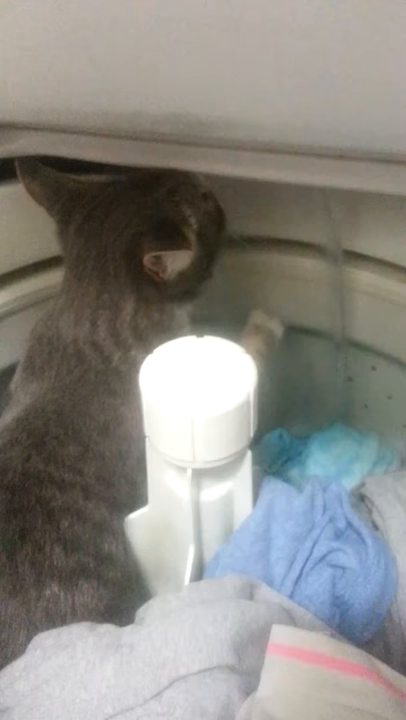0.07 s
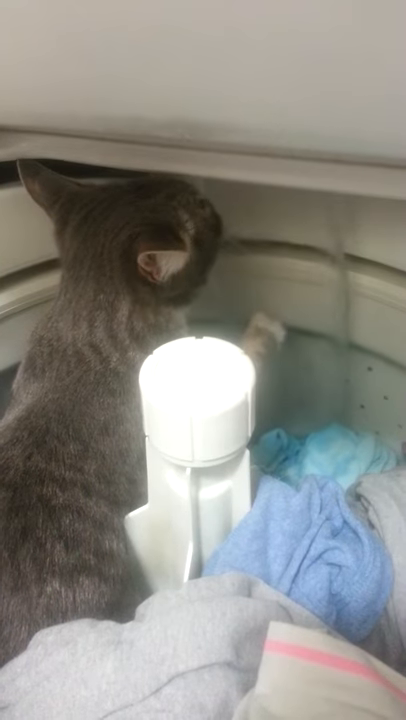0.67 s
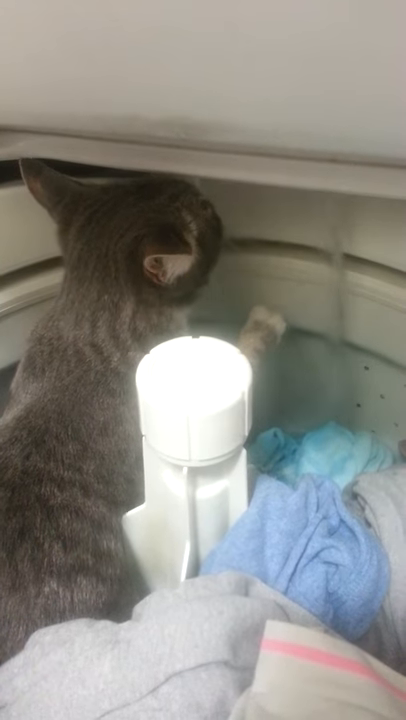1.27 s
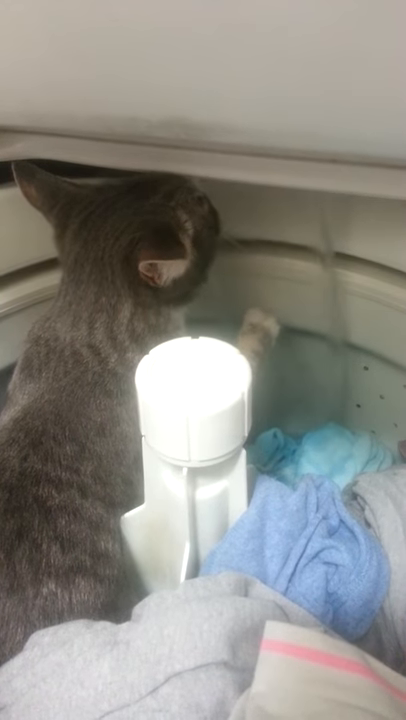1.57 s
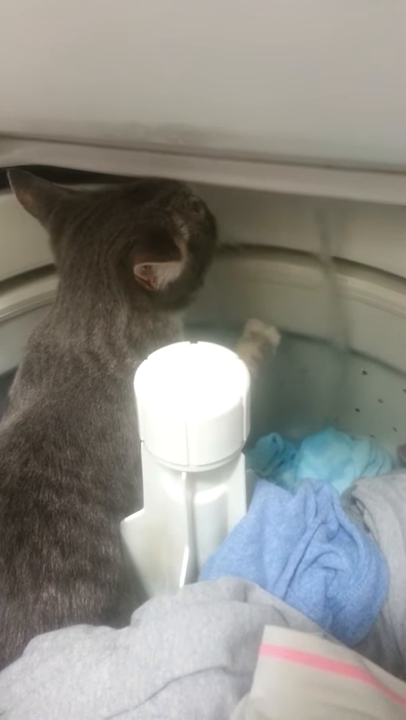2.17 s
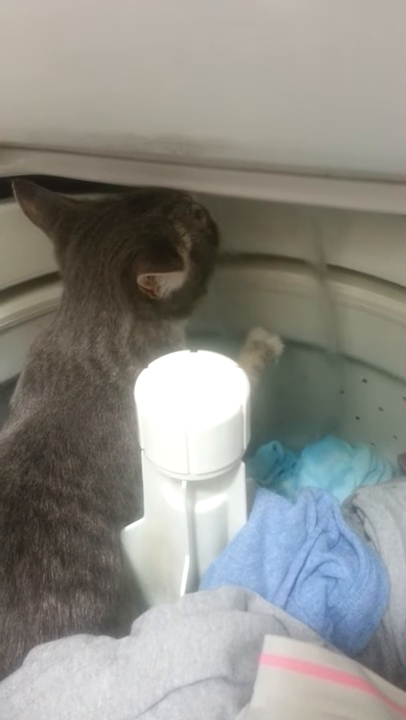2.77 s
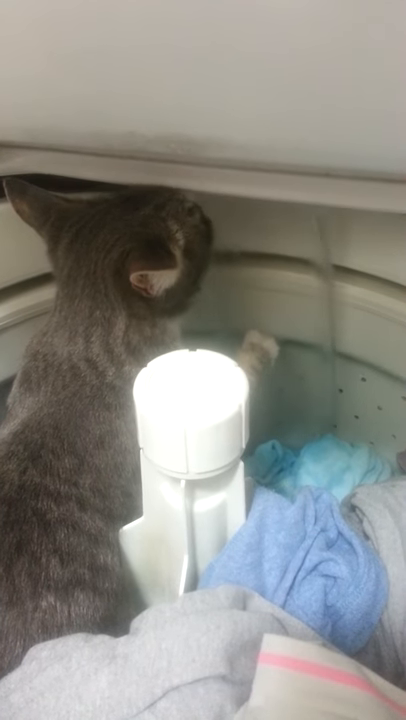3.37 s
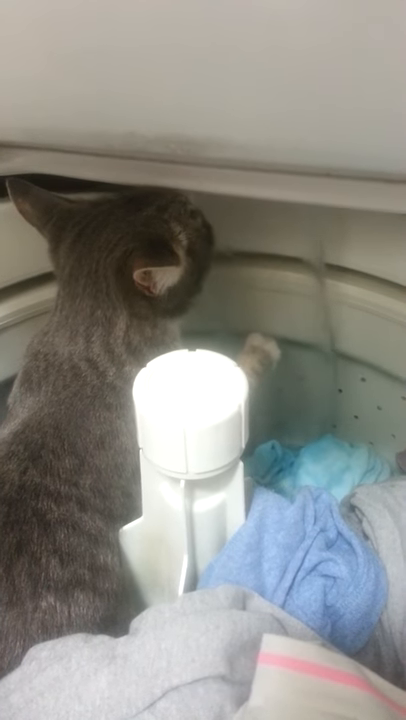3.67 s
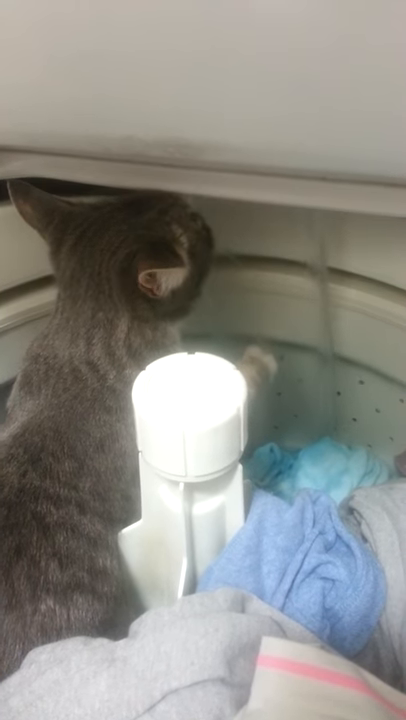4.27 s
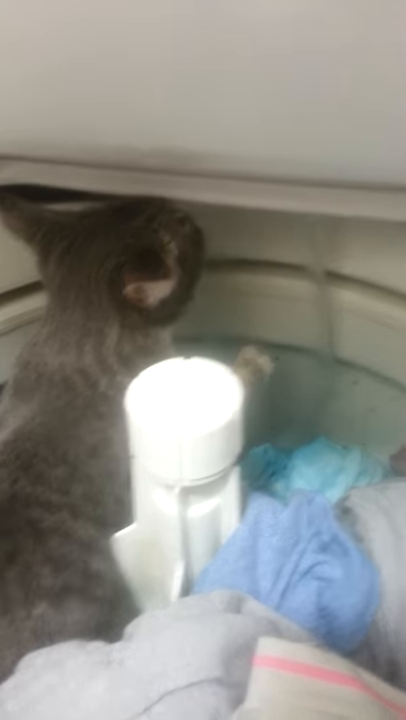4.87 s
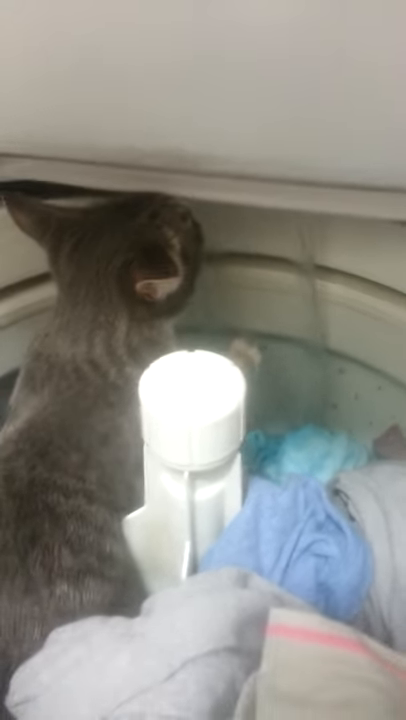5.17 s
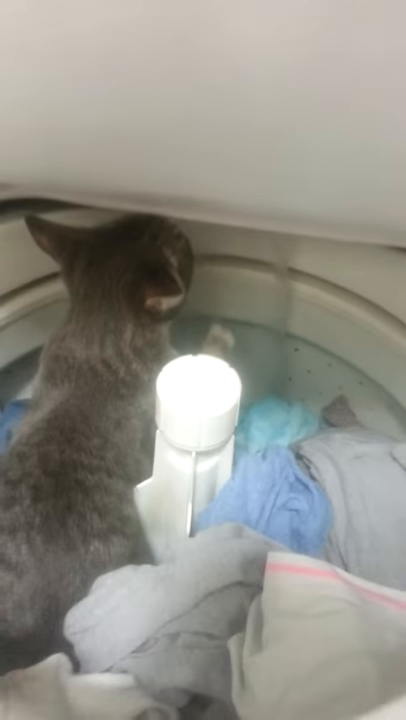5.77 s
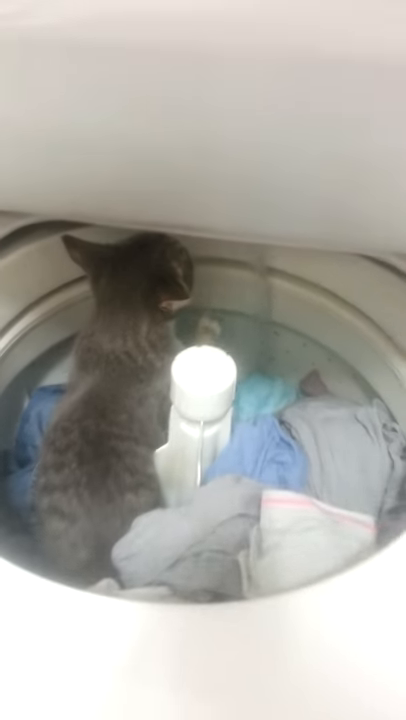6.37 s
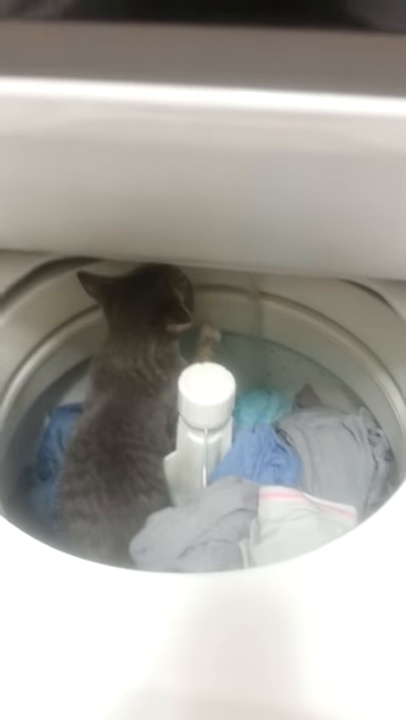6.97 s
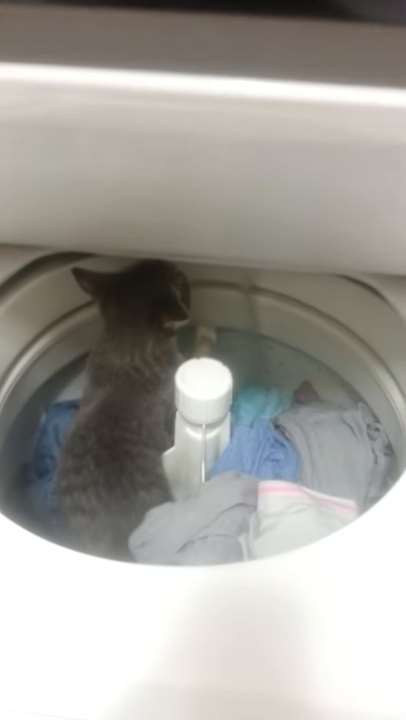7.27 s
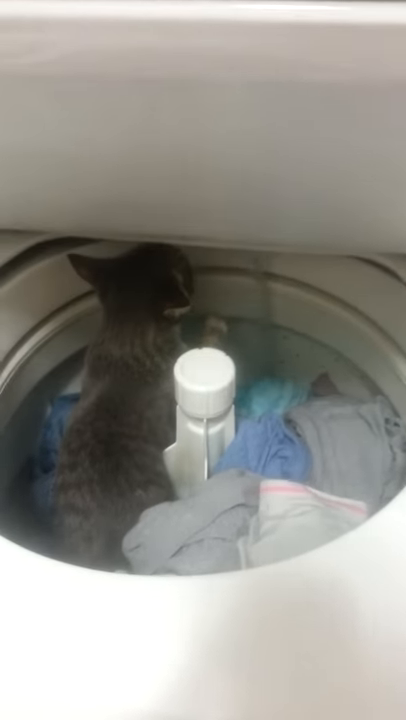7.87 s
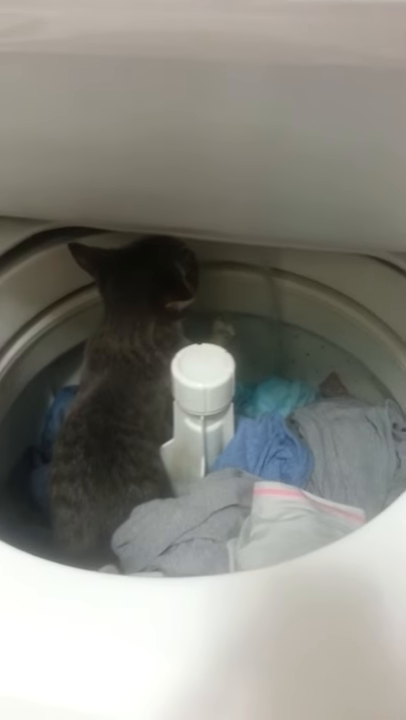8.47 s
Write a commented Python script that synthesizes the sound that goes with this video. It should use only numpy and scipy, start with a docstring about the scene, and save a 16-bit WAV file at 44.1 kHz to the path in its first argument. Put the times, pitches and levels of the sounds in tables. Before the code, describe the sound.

After silence, a splashing rush of water starts abruptly at about 0.8 seconds: a top-loading washing machine is filling, heard close at the mouth of its steel tub. The stream falls steadily into pooled water, spattering and gurgling with a hollow, slightly metallic ring, while the inlet valve hums faintly underneath. Big drops plop irregularly throughout, and droplets occasionally tick on the wall. At about 2.1 seconds a heavier slap makes the tub boom briefly, followed by two tiny, thin squeaks around 2.3 seconds. Two more dull slaps land near 5 and 5.6 seconds. From about 5.2 to 6.4 seconds, small drops come in quick flurries as the microphone draws back above the rim, and the water becomes slightly softer and less bright. The pouring and plopping continue until the end, at around 8.6 seconds.

```python
"""A splashing rush of water starts abruptly: a top-loading washing machine is filling, its valve humming.
A sheet of water falls into the pool in the steel tub, spattering and trapping bubbles that ring.
Big drops plop, droplets tick on the wall, heavy slaps make the tub boom, and two thin squeaks slip in.
From about five seconds, small drops come in flurries as the microphone draws back from the mouth of
the tub, where its resonances are strong, to above the rim."""
import sys
import numpy as np
from scipy import signal
from scipy.fft import rfft, irfft, next_fast_len
from scipy.io import wavfile
from scipy.ndimage import uniform_filter1d

SR = 44100
rng = np.random.default_rng(int(sys.argv[2]) if len(sys.argv) > 2 else 0)


def transcribe(signal):
    """Save signal, clipped to [-1, 1], as a 16-bit WAV file at the path in sys.argv[1]."""
    frames = np.atleast_2d(signal).T
    limited = np.clip(frames, -1, 1)
    pcm = np.round(limited * 32767).astype(np.int16)
    wavfile.write(sys.argv[1], SR, pcm)


N = 380583
TIME = np.arange(N) / SR
TAPS = 16384   # length of the tone-shaping filters, in samples
FREQ = np.maximum(np.arange(TAPS // 2 + 1) * SR / TAPS, 1)

# Table levels are relative: the functions add their own gains.
# low churning where the stream plunges in: (time [s], level [dB])
CHURN_LEVELS = [(0.85, -40), (2.0, -39.5), (5.1, -40), (5.7, -41.5), (6.2, -42), (7.3, -42.5), (8.0, -44),
                (8.6, -42)]
# middle and top of the falling water's sound: (time [s], gurgle [dB], spatter [dB])
FLOW_LEVELS = [(0.85, -36.5, -36), (1.27, -34.5, -34.5), (1.64, -36.5, -36), (2.0, -35.5, -34),
               (2.31, -36, -35), (2.68, -35, -35.5), (3.14, -35.5, -33.5), (3.4, -34, -35),
               (3.75, -36, -36), (4.22, -34, -35), (4.55, -34, -33.5), (4.95, -35.3, -34), (5.12, -37, -35),
               (5.24, -36.3, -33), (5.38, -38.5, -37), (5.56, -36, -33), (5.8, -35, -35.5),
               (5.95, -38.5, -34.5), (6.22, -38.5, -36), (6.35, -43, -40), (6.5, -41.5, -37),
               (6.72, -38, -35), (6.85, -39.5, -36), (7.0, -39.5, -34.8), (7.4, -38.5, -36.5),
               (7.7, -40.5, -36.5), (7.83, -39.5, -35), (7.95, -41, -36), (8.1, -40, -35.5),
               (8.35, -38, -33), (8.6, -40, -38.5)]
# path of the microphone: (time [s], position [0 = near, in the tub's mouth; 1 = far, above the rim])
MIC_PATH = [(5.2, 0.12), (5.7, 0.45), (6.0, 0.75), (6.4, 1)]
# tone of the water, near and far: (frequency [Hz], gain [dB])
NEAR_TONE = [(35, -33), (70, -14.5), (140, -5), (550, -4.5), (1300, -2.5), (3000, 1.5), (4700, 0),
             (6000, -4), (9000, -3.5), (14500, -13.5)]
FAR_TONE = [(35, -23), (70, -23), (140, -5.5), (550, -1.5), (1300, 2.5), (3000, -1), (4700, -2.5),
            (6000, -9.5), (9000, -7.5), (14500, -16.5)]
# pitches that the tub and lid boost or swallow: (frequency [Hz], width [Hz], left [dB], right [dB])
NEAR_RESONANCES = [(233, 36, 6.7, 6.6), (285, 82, 6, 8.3), (357, 55, 7.6, 5.2), (426, 108, 3.0, 8.1),
                   (698, 70, 4.4, 4.8), (790, 216, 6.6, 5.4), (992, 190, 9.2, 5.8), (1420, 120, -4, -4),
                   (1610, 220, 4.5, 3.5), (1800, 300, 3, 7.3), (2120, 80, -4, -4), (2230, 150, 3.2, 5.0),
                   (2490, 70, -4, -4), (2627, 110, -1, 7), (2910, 35, 3.5, 3.5), (3045, 270, 3.0, -1.5),
                   (3400, 450, 3, 3), (3730, 130, -6, -6), (3950, 300, 2, 0.5), (4512, 540, 3.6, 2.2),
                   (5080, 260, 4.5, 1.6), (6438, 687, 5.8, 1.3), (13000, 3600, 0.3, 3.6)]
FAR_RESONANCES = [(167, 22, 4, 4), (229, 28, 6, 6), (282, 55, 8.5, 10.2), (424, 60, 4.6, 5.8),
                  (706, 104, 2.0, 7.2), (828, 167, 7.4, 5.5), (1313, 144, 1, 1), (1735, 125, 2, 5),
                  (1915, 99, 4.5, 1.5), (2208, 170, 3.3, 2.4), (2619, 130, 1.8, 1.3), (3080, 160, 2.5, 2),
                  (3450, 260, 4.6, 2.2), (3950, 350, 4.8, 2), (4960, 720, 4.8, 1.1),
                  (13474, 4383, -1.0, 5.6)]
# how left and right hear the tub: (frequency [Hz], likeness [0-1], left's lead [radians])
NEAR_STEREO = [(120, 0.93, 1), (300, 0.95, -0.5), (560, 0.86, -0.2), (900, 0.58, 0.6), (1100, 0.66, -0.6),
               (1410, 0, 0), (1550, 0.45, -1.74), (2020, 0.4, -0.5), (2130, 0.4, 2), (2470, 0.3, 1.5),
               (2830, 0.3, 0.55), (3360, 0.86, -2.44), (3590, 0.43, -0.5), (4410, 0.12, 3.5),
               (4840, 0.25, 0.5), (5960, 0, 2), (6750, 0.4, -0.9), (8300, 0, 0)]
FAR_STEREO = [(120, .95, 1), (280, 1, -0.5), (516, 0.39, -0.1), (750, 0.93, 0.6), (1400, .62, -0.8),
              (1800, 0.45, -0.5), (2100, 0.38, -0.5), (2580, 0.37, 0.26), (3560, 0.6, -2.5),
              (4200, 0.12, 0), (5040, .38, -1.5), (9000, 0.06, 0)]
# bright resonance where the stream lands: (time [s], centre [Hz], level [dB])
LANDING_RING = [(0.85, 3230, -41), (1.2, 3170, -40), (1.6, 3200, -49.5), (2.0, 3220, -34.5),
                (2.35, 3150, -36), (2.8, 3070, -41), (3.1, 3160, -36), (3.42, 3080, -40),
                (3.75, 3200, -34.5), (4.2, 3220, -35), (4.55, 3230, -39), (4.98, 3080, -36),
                (5.1, 3220, -43), (5.3, 3340, -44), (5.6, 3300, -58)]
# how strongly the water rings the steel drum: (time [s], deep ring [dB], low ring [dB], high ring [dB])
DRUM_LEVELS = [(0.85, -56, -52, -50), (1.7, -52, -53, -51), (2.3, -56, -46, -46), (2.7, -56, -52, -53),
               (3.1, -56, -49, -49), (3.6, -56, -53, -54), (4.3, -56, -51, -48), (5.1, -56, -49, -46.5),
               (5.45, -60, -54, -60), (7.3, -60, -58, -62), (7.7, -49, -55, -62), (7.95, -46, -43.5, -62),
               (8.25, -45.5, -43, -62), (8.6, -46, -44, -62)]
# tones in the inlet valve's hum: (frequency [Hz], level [dB])
HUM_TONES = [(119.8, -50.5), (239.6, -53.5), (359.4, -54), (419.3, -54), (479.2, -54.5)]
# separate big drops: (time [s], bubble [dB], bubble pitch [Hz], low slap [dB], bright splash [dB])
BIG_DROPS = [(0.893, -17.5, 1600, -34, -24), (0.947, -15.5, 1760, -35, -31), (1.149, -27, 1677, -37, -25),
             (1.2, -12, 4040, -36, -34), (1.429, -15, 3760, -19, -30), (1.444, -16, 3400, -25, -29),
             (1.771, -18, 2830, -32, -30), (1.794, -19.5, 984, -37, -20), (2.027, -19, 3340, -29, -25),
             (2.053, -17, 3530, -38, -25), (2.075, -22, 1750, -22, -31), (2.14, -14, 1720, -13, -16),
             (2.154, -24, 860, -25, -23), (2.207, -26, 1800, -22, -22), (2.276, -25, 1000, -24, -25),
             (2.467, -20, 3300, -21.5, -24), (2.483, -20, 2830, -35, -29), (2.616, -23, 715, -34, -40),
             (2.69, -24, 950, -21, -35), (2.886, -21, 1850, -36, -24), (3.016, -24, 1700, -43, -18),
             (3.034, -18, 2840, -40, -17), (3.101, -8, 3000, -36, -27), (3.106, -16, 2870, -40, -31),
             (3.239, -19, 880, -14, -32), (3.25, -26, 790, -27, -38), (3.46, -18, 1750, -31, -41),
             (3.685, -22, 1700, -19, -23.5), (3.902, -22.5, 860, -28, -24), (3.961, -26, 780, -18, -25),
             (4.044, -20, 794, -30, -35), (4.064, -24, 820, -28, -38), (4.233, -25, 1000, -24, -36),
             (4.304, -12, 3260, -37, -30), (4.38, -20, 1730, -38, -24.5), (4.425, -25, 750, -30, -31),
             (4.441, -18, 1690, -35, -40), (4.494, -8, 3180, -24, -22), (4.529, -13, 3210, -36, -25),
             (4.547, -24, 975, -22, -36), (4.586, -16, 1240, -21, -20), (4.607, -21, 805, -22, -22),
             (4.835, -17, 1720, -17, -28), (4.854, -20, 1690, -31, -35), (4.904, -28, 1870, -36, -36),
             (4.916, -15, 1730, -32, -33), (4.945, -21, 770, -28, -40), (5.031, -19, 1620, -18, -28),
             (5.04, -10, 615, -19, -26), (5.072, -23, 814, -30, -34), (5.15, -19, 1680, -27, -24.5),
             (5.202, -32, 1760, -20.5, -32), (5.25, -19, 1710, -38, -32), (5.437, -18, 3400, -46, -32),
             (5.558, -21, 1600, -34, -32), (5.582, -21, 980, -23, -24), (5.597, -17, 1740, -30, -39),
             (5.621, -22, 1870, -40, -40), (5.694, -17, 1740, -37, -27), (5.713, -17, 1700, -28, -26),
             (5.777, -18, 3810, -42, -27), (5.801, -27, 806, -22, -26), (5.82, -22, 1860, -30, -24),
             (5.99, -21, 1710, -40, -32), (6.137, -19, 1870, -41, -41), (6.175, -25, 1940, -24, -28),
             (6.194, -25, 810, -28, -27), (6.218, -16, 3380, -31, -23), (6.308, -19, 1810, -27, -40),
             (6.388, -17.5, 1880, -31, -26), (6.428, -24, 784, -34, -40), (6.465, -24, 1960, -27.5, -29),
             (6.498, -23, 2430, -24, -27.5), (6.526, -26, 2460, -39, -26), (6.654, -21, 1250, -40, -38),
             (6.699, -20, 746, -33, -21), (6.731, -21, 1800, -23, -22.5), (6.772, -18, 1830, -39, -39),
             (6.797, -19, 1370, -34, -33), (6.812, -25, 1960, -36, -32), (6.908, -26, 740, -34, -34),
             (6.922, -20, 3900, -33, -26), (7.037, -14, 3320, -35, -26.5), (7.158, -26, 2210, -42, -27),
             (7.225, -17, 4000, -38, -19.5), (7.243, -21, 2130, -40, -19), (7.26, -20, 2030, -42, -31),
             (7.31, -25, 1690, -32, -36), (7.329, -21, 1200, -32, -40), (7.37, -22, 1950, -25, -25),
             (7.389, -24, 2020, -40, -26), (7.425, -21, 4580, -44, -29), (7.503, -28, 810, -38, -39),
             (7.549, -25, 2020, -41, -34), (7.637, -24, 2560, -43, -22), (7.646, -18, 5200, -42, -31),
             (7.658, -15, 3480, -38, -27), (7.709, -25, 1650, -42, -33), (7.718, -17, 3850, -27, -22),
             (7.777, -20, 2420, -29, -36), (7.868, -17.5, 4900, -34, -31), (8.335, -19, 4620, -46, -32),
             (8.379, -22, 2320, -40, -25), (8.505, -19, 2000, -40, -29), (8.598, -23, 2680, -34, -25.5)]
# droplets hitting the tub wall: (time [s], level [dB], pitch [Hz])
WALL_TICKS = [(2.068, -44, 10500), (2.079, -51, 10500), (2.709, -40, 13200), (2.467, -35, 6330),
              (3.258, -30.5, 5130), (4.5855, -34.5, 6570), (4.882, -38, 13100), (5.042, -38, 12000),
              (5.219, -31, 4530), (5.915, -33, 5540), (6.177, -32.5, 4170), (6.463, -53, 12500),
              (6.695, -51, 12000), (7.305, -41, 7300), (7.637, -37, 4400), (7.647, -37.5, 5000),
              (7.868, -39, 5200)]
# slaps that shake the tub: (time [s], boom [dB], dull thud [dB])
HEAVY_SLAPS = [(2.141, -35, -40), (5.040, -40, -27.5), (5.583, -59, -26)]
# two thin squeaks: (time [s], swell and fade time [s], pitch [Hz], level [dB])
THIN_SQUEAKS = [(2.328, 0.0087, 5090, -26), (2.341, 0.017, 2800, -28.5)]
# quick runs of small drops: (start [s], length [s], level [dB], bubble pitch [Hz])
DROP_FLURRIES = [(5.208, .12, -22.5, 1700), (5.44, .085, -23, 1690), (5.642, .06, -23, 1770),
                 (5.851, .06, -26, 1820), (6.232, .06, -26, 1890)]


def from_db(db):
    """Turn decibels into a gain."""
    return 10 ** (np.asarray(db) / 20)


def rms_one(x):
    """Scale a sound to an average strength (rms) of 1."""
    return x / np.sqrt(np.mean(x ** 2) + 1e-20)


def in_time(rows):
    """Turn each column after the time into a curve with a value at every sample."""
    times, *columns = np.transpose(rows)
    return [np.interp(TIME, times, column) for column in columns]


def at_hz(points):
    """Join (frequency, value) points into a curve over FREQ."""
    hz, value = np.transpose(points)
    return np.interp(np.log(FREQ), np.log(hz), value)


def drift(per_s):
    """A random wander of size about 1 that takes per_s new turns a second."""
    knots = rng.standard_normal(4000)
    return rms_one(np.interp(TIME * per_s, np.arange(len(knots)), knots))


def band(x, low_hz, high_hz):
    """Gently cut away what lies outside two frequencies."""
    edges = [low_hz, min(high_hz, .45 * SR)]
    return signal.sosfilt(signal.butter(2, edges, "band", fs=SR, output="sos"), x)


def shaped(x, db):
    """Give each channel a gain over FREQ; the filter is minimum-phase, so nothing rings early."""
    cepstrum = irfft(np.log(from_db(db)), TAPS)
    cepstrum[:, 1:TAPS // 2] *= 2
    cepstrum[:, TAPS // 2 + 1:] = 0
    response = irfft(np.exp(rfft(cepstrum)), TAPS)
    return signal.oaconvolve(x, response, axes=1)[:, :N]


def add(out, start_s, sound):
    """Mix a short sound into both channels."""
    i = int(start_s * SR)
    out[:, i:i + sound.shape[1]] += sound[:, :N - i]


def impacts(per_s, spread_db, cap):
    """Random clicks of either sign: many small, a few up to cap * spread_db louder."""
    chance = (rng.random(N) + 1e-12) * SR / per_s
    hits = np.flatnonzero(chance < 1)
    clicks = np.zeros(N)
    clicks[hits] = from_db(spread_db * np.minimum(-np.log(chance[hits]), cap)) * (-1.) ** hits
    return clicks


def gushes(per_s, fade_s, steady):
    """Lumps of water land suddenly and their spray dies away: a flow that averages 1."""
    landings = np.abs(impacts(per_s, spread_db=2.5, cap=2.2))
    lumps = signal.lfilter([1], [1, -np.exp(-1 / (fade_s * SR))], landings)
    return (lumps / lumps.mean() + steady) / (1 + steady)


def wall_echoes(early_s, tail_s, tail_db):
    """Left and right paths out of the tub: a tight cluster of echoes, then a short tail."""
    t = TIME[:3000]
    fade = np.exp(-t / early_s) + from_db(tail_db) * np.exp(-t / tail_s)
    paths = rng.standard_normal((2, len(t))) * fade
    return paths / np.sqrt(np.sum(paths ** 2, axis=1, keepdims=True))


def spatter(surge, per_s, spread_db, spots):
    """Drops land at many spots, each with its own echoes."""
    out = 0
    for _ in range(spots):
        clicks = impacts(per_s * surge / spots, spread_db, cap=2.7)
        paths = wall_echoes(early_s=.0005, tail_s=.007, tail_db=-16)
        out = out + signal.oaconvolve(clicks[None], paths, axes=1)[:, :N]
    return rms_one(out)


def bubbles(surge, per_s, cycles, spread_db, pitches=30):
    """Trapped bubbles ring briefly, some longer than others; small, high ones are the most common."""
    out = np.zeros((2, N))
    for hz in np.geomspace(600, 6200, pitches):
        clicks = impacts(per_s * surge * np.sqrt(hz / 1000) / pitches, spread_db, cap=2.74)
        ring_s = cycles * 2 ** rng.uniform(-1.35, 1) / hz
        decay = from_db(-60 / (ring_s * SR))
        step = 2 * np.pi * hz / SR
        feedback = [1, -2 * decay * np.cos(step), decay ** 2]   # each click starts a dying tone
        for channel, phase in enumerate(rng.uniform(0, 2 * np.pi, 2)):
            kick = [np.sin(phase), decay * np.sin(step - phase)]
            out[channel] += np.sqrt(hz) * rms_one(signal.lfilter(kick, feedback, clicks + 1e-18))
    return rms_one(out)


def plinks(surge, per_s, cycles, rise, spread_db):
    """Bubbles just under the surface ring clearly, each climbing in pitch as it rises."""
    out, t = np.zeros((2, N)), TIME[:1400]
    strengths = impacts(per_s * surge, spread_db, cap=2.1)
    traits = rng.random((N, 4))
    for i in np.flatnonzero(strengths):
        pitch, life, *phases = traits[i]
        hz = 650 * 2 ** (3 * pitch ** .8)
        age = t * hz / (cycles * 2 ** (2 * life - 1))
        turns = hz * t * (1 + rise * np.minimum(age, 2)) + np.array(phases)[:, None]
        swell = (1 - np.exp(-t * hz)) * np.exp(-age)
        add(out, i / SR, strengths[i] * hz / 1000 * swell * np.sin(2 * np.pi * turns))
    return rms_one(out)


def ripple_db(spacing_hz=40, depth_db=4.2):
    """The tub's countless small resonances lift and dip the middle frequencies."""
    knots = rng.uniform(-1, 1, (2, 3000))
    depth = depth_db * at_hz([(300, 0), (1000, .3), (2000, 1), (3800, 1), (7000, .4)])
    return depth * np.array([np.interp(FREQ / spacing_hz, np.arange(len(row)), row) for row in knots])


def tub_db(resonances):
    """Each big resonance of the tub is a bell-shaped peak or dip in the left and right gain."""
    return sum(np.array([[left], [right]]) / (1 + (2 * (FREQ - hz) / width_hz) ** 2)
               for hz, width_hz, left, right in resonances)


def out_of_step(sound, stereo):
    """Each standing wave in the tub reaches left and right at a different point in its swing."""
    hz, _, lead = np.transpose(stereo)
    size = next_fast_len(N + TAPS)
    lag = np.interp(np.arange(size // 2 + 1) * SR / size, hz, np.unwrap(lead))
    right = irfft(rfft(sound[1], size) * np.exp(-1j * lag), size)[:N]
    return np.array([sound[0], right])


def at_mic(water, stereo):
    """Left and right share much of the water's sound, rippled by the tub's small resonances."""
    alike = np.clip(at_hz([row[:2] for row in stereo]), 0, .99)
    share_db = 10 * np.log10(np.array([1 + alike, 1 - alike]))
    mid, side = shaped(water, ripple_db() + share_db)
    return out_of_step(np.array([mid + side, mid - side]), stereo)


def through_tub(water, tone, resonances):
    """The tub colours the water's sound as heard from one position."""
    return rms_one(shaped(water, at_hz(tone) + tub_db(resonances)))


def follow_flow(water, wobble_per_s=16, shared_db=.4, own_db=.7):
    """Churning, gurgle and spatter swell with the stream, wobbling both together and on their own."""
    low, low_and_mid = (signal.sosfiltfilt(signal.butter(3, hz, fs=SR, output="sos"), water)
                        for hz in (500, 2200))
    parts = low, low_and_mid - low, water - low_and_mid
    levels = in_time(CHURN_LEVELS) + in_time(FLOW_LEVELS)   # three curves, one for each part
    wobble = shared_db * drift(wobble_per_s)
    return sum(from_db(db + wobble + own_db * drift(wobble_per_s)) * part / np.std(part.mean(axis=0))
               for part, db in zip(parts, levels))


def draw_back(near, far):
    """The microphone moves from the mouth of the tub to above the rim."""
    position = in_time(MIC_PATH)[0]
    return (1 - position) * near + position * far


def ringing(x, hz, width_hz):
    """A resonance lets through only a band around a pitch, which may move."""
    spin = np.exp(2j * np.pi * np.cumsum(hz * np.ones(N)) / SR)
    narrow = signal.sosfilt(signal.butter(2, width_hz / 2, fs=SR, output="sos"), x / spin)
    return rms_one((spin * narrow).real)


def steel_rings(water):
    """Water rings its landing spot and three drum notes; two pitches wander as that spot shifts."""
    landing_hz, landing_db = in_time(LANDING_RING)
    deep_db, low_db, high_db = in_time(DRUM_LEVELS)
    return (from_db(landing_db) * ringing(water, hz=landing_hz + 60 * drift(per_s=20), width_hz=520)
            + from_db(deep_db) * ringing(water, hz=243, width_hz=44)
            + from_db(low_db) * ringing(water, hz=2785, width_hz=130)
            + from_db(high_db) * ringing(water, hz=5090 + 60 * drift(per_s=6), width_hz=220))


def stream(hiss_db, bubble_db, plink_db, wash_db):
    """The sheet of water breaks into gushes: clumps of spatter, bubbles and plinks over a fine hiss."""
    surge = gushes(per_s=130, fade_s=.0045, steady=.8)
    water = spatter(surge, per_s=2100, spread_db=4.5, spots=12)
    water += from_db(bubble_db) * bubbles(surge, per_s=750, cycles=21, spread_db=5)
    water += from_db(plink_db) * plinks(surge, per_s=230, cycles=19, rise=.0077, spread_db=3)
    water += from_db(hiss_db) * rng.standard_normal((2, N))
    near = through_tub(at_mic(water, NEAR_STEREO), NEAR_TONE, NEAR_RESONANCES)
    far = through_tub(at_mic(water, FAR_STEREO), FAR_TONE, FAR_RESONANCES)
    wash = draw_back(follow_flow(near), follow_flow(far))
    on_steel = at_mic(spatter(surge, per_s=1500, spread_db=4.5, spots=5), NEAR_STEREO)
    return from_db(wash_db) * wash + steel_rings(on_steel)


def valve(waver_db, far_db):
    """The valve's electromagnet hums at twice the mains rate, fainter from above the rim."""
    hum = 0
    for hz, db in HUM_TONES:
        strength = np.sqrt(2) * from_db(db + waver_db * drift(per_s=5.7))
        hum = hum + strength * np.sin(2 * np.pi * (hz * TIME + rng.random()))
    pan_db = np.array([[-.8], [.8]])
    return hum * from_db(far_db * in_time(MIC_PATH)[0] + pan_db)


def echoed(sound, echo_db):
    """A sound arrives directly and also bounces off the tub wall."""
    paths = wall_echoes(early_s=.0015, tail_s=.012, tail_db=-11)
    return sound + from_db(echo_db) * signal.fftconvolve(sound[None], paths, axes=1)[:, :len(sound)]


def drops(rows, cycles, splash_s, bubble_db, slap_db, splash_db):
    """A drop slaps the pool, splashes, and leaves a bubble whose pitch rises as it dies."""
    out, t = np.zeros((2, N)), TIME[:3000]
    noise = rng.standard_normal((len(rows), 2, len(t)))
    slaps, splashes = band(noise[:, 0], 580, 1370), band(noise[:, 1], 1730, 3660)
    for (start_s, ring_db, hz, low_db, bright_db), slap, splash in zip(rows, slaps, splashes):
        age = t * np.sqrt(hz * 1000) / cycles
        bubble = np.sin(2 * np.pi * hz * t * (1 + 4 * t)) * age * np.exp(1 - age)
        burst = from_db(low_db + slap_db) * rms_one(slap)
        burst += from_db(bright_db + splash_db) * rms_one(splash)
        sound = from_db(ring_db + bubble_db) * bubble + burst * np.exp(-t / splash_s)
        add(out, start_s, echoed(sound, echo_db=-10))
    return out


def hollow(sound, resonances, stereo):
    """The tub's resonances make single drops sound hollow but no louder overall."""
    db = tub_db(resonances) + ripple_db()
    average_db = 10 * np.log10(uniform_filter1d(from_db(db) ** 2, size=400, axis=1))
    return out_of_step(shaped(sound, db - average_db), stereo)


def ticks(ring_s, gain_db):
    """Droplets tick brightly on the steel."""
    out, t = np.zeros((2, N)), TIME[:2000]
    for start_s, db, hz in WALL_TICKS:
        noise = band(rng.standard_normal(len(t)), min(hz * .92, 13000), hz * 1.13)
        tick = from_db(db + gain_db) * rms_one(noise) * np.exp(-t / ring_s)
        add(out, start_s, echoed(tick, echo_db=-1))
    return out


def booms(hz, swell_s, thud_s):
    """The heaviest slaps thud dully and set the whole tub booming; the boom swells, then fades."""
    out, t = np.zeros((2, N)), TIME[:12000]
    boom = np.sin(2 * np.pi * hz * t) * t / swell_s * np.exp(1 - t / swell_s)
    for start_s, boom_db, thud_db in HEAVY_SLAPS:
        thud = rms_one(band(rng.standard_normal(len(t)), 230, 1130)) * np.exp(-t / thud_s)
        add(out, start_s, (from_db(boom_db) * boom + from_db(thud_db) * thud)[None])
    return out


def squeaks(rough):
    """Thin, slightly rough tones swell quickly and ring out, a little to the right."""
    out, t = np.zeros((2, N)), TIME[:7000]
    pan_db = np.array([[-2.5], [2.5]])
    for start_s, swell_s, hz, db in THIN_SQUEAKS:
        swell = t / swell_s * np.exp(1 - t / swell_s)
        flutter = 1 + rough * drift(per_s=260)[:len(t)]
        tone = np.sin(2 * np.pi * hz * t + rough * drift(per_s=200)[:len(t)])
        add(out, start_s, from_db(db + pan_db) * swell * flutter * tone)
    return out


def flurries(per_s, detune, spread_db, slap_db, splash_db):
    """Uneven runs of small drops, each with its own strength and pitch; gives rows like BIG_DROPS."""
    rows = []
    for start_s, length_s, level_db, hz in DROP_FLURRIES:
        count = max(1, round(length_s * per_s))
        draws = rng.uniform(-1, 1, (40, 5))[:count]
        for k, (late, pitch, size, slap, splash) in enumerate(draws):
            time_s = start_s + (k + (1 + late) / 2) / per_s
            db = level_db + spread_db * size
            rows.append((time_s, db, hz * (1 + detune * pitch),
                         db + slap_db + spread_db * slap, db + splash_db + spread_db * splash))
    return rows


def scene():
    """The stream, the valve, the drops, the struck steel and the squeaks together."""
    water = stream(hiss_db=-2.5, bubble_db=-8.5, plink_db=-12, wash_db=-.7)
    drips = drops(BIG_DROPS, cycles=2.6, splash_s=.005, bubble_db=-7, slap_db=-4, splash_db=-.5)
    small_drops = flurries(per_s=48, detune=.07, spread_db=4, slap_db=-22, splash_db=-11)
    drips += drops(small_drops, cycles=2.9, splash_s=.005, bubble_db=-7.5, slap_db=-1.5, splash_db=-1.5)
    near = hollow(drips, NEAR_RESONANCES, NEAR_STEREO)
    far = hollow(drips, FAR_RESONANCES, FAR_STEREO)
    steel = booms(hz=113.7, swell_s=.018, thud_s=.012) + ticks(ring_s=.0032, gain_db=8.5)
    return water + draw_back(near, far) + steel + squeaks(rough=.15) + valve(waver_db=2.5, far_db=-5)


def record(dry):
    """The sound switches on after a short silence, and the highest treble is cut steeply."""
    start_s, cutoff_hz = .8132, 14750
    opened = dry * np.clip((TIME - start_s) / .002, 0, 1)
    return signal.sosfilt(signal.ellip(12, .2, 75, cutoff_hz, fs=SR, output="sos"), opened)


dry = scene()
out = record(dry)
transcribe(out)
```